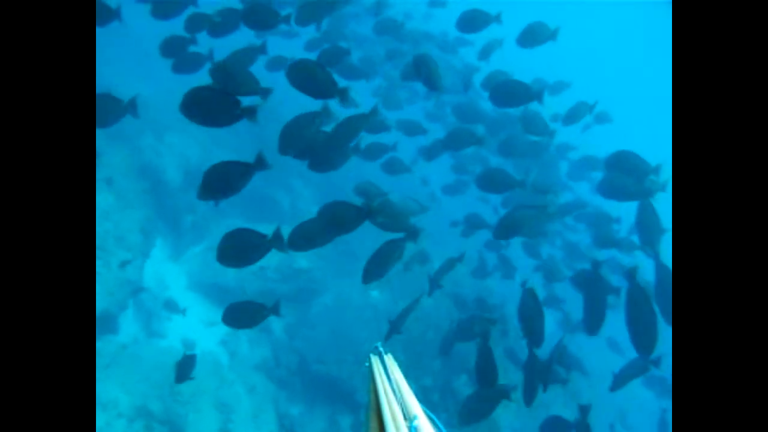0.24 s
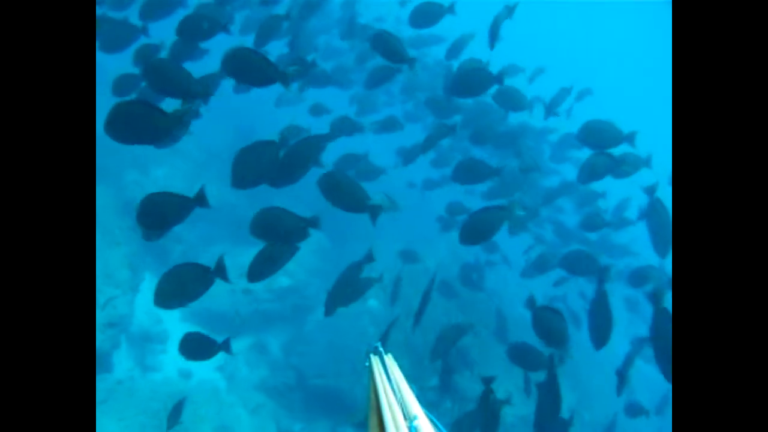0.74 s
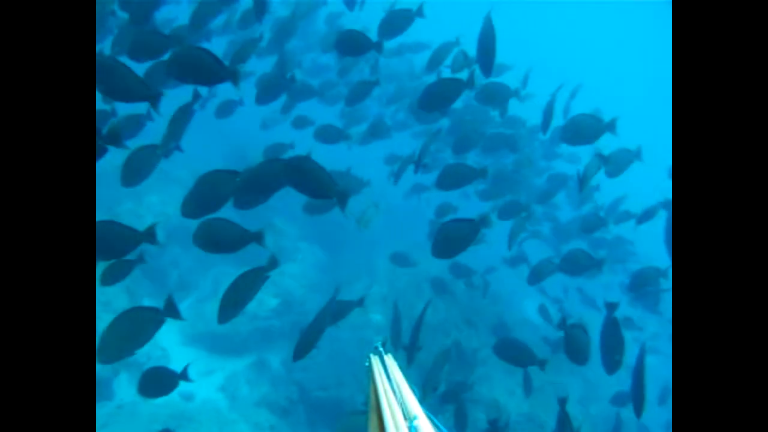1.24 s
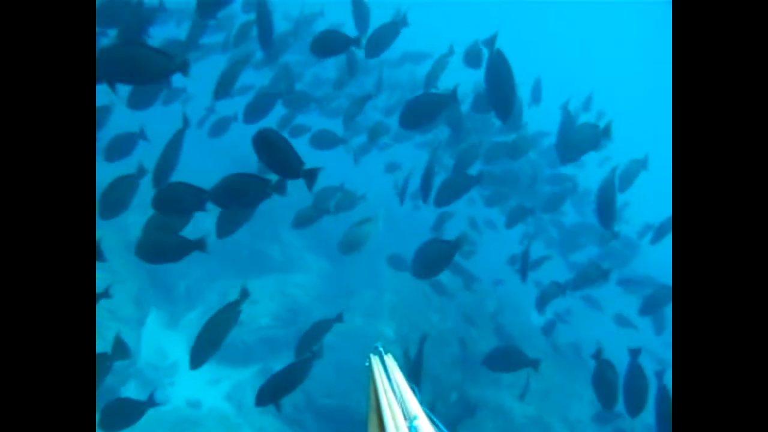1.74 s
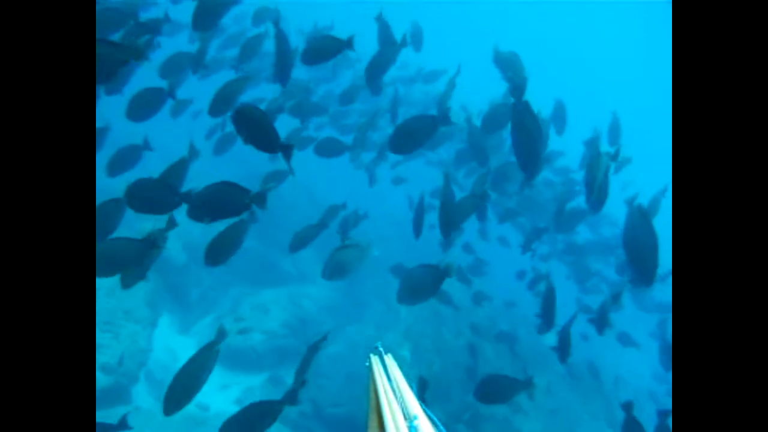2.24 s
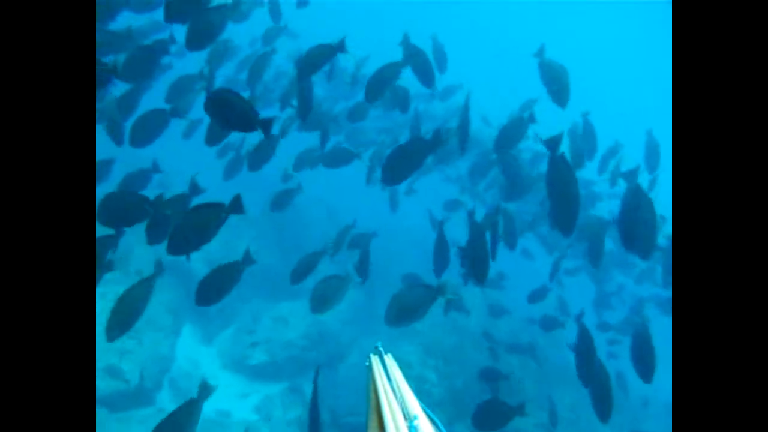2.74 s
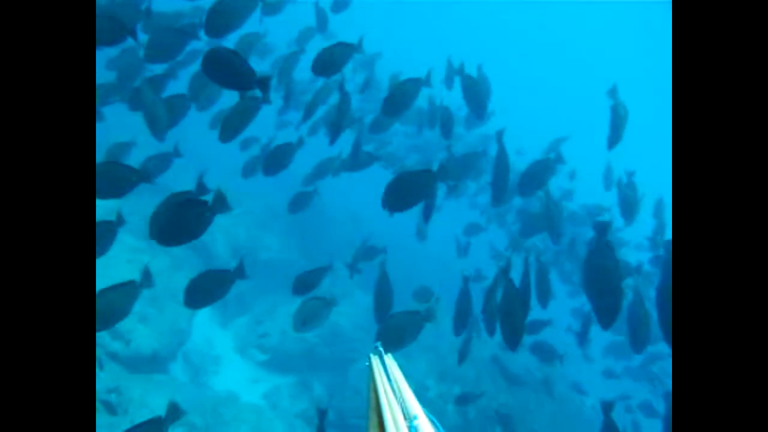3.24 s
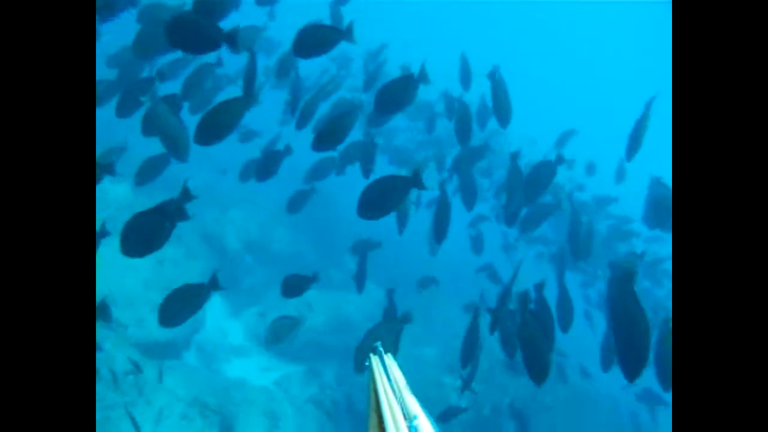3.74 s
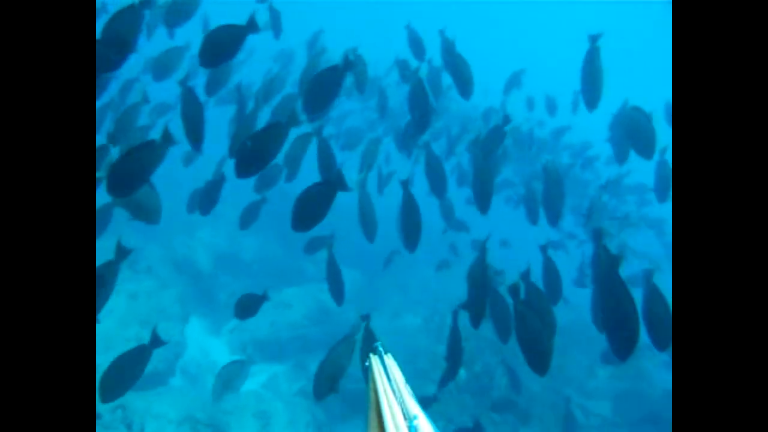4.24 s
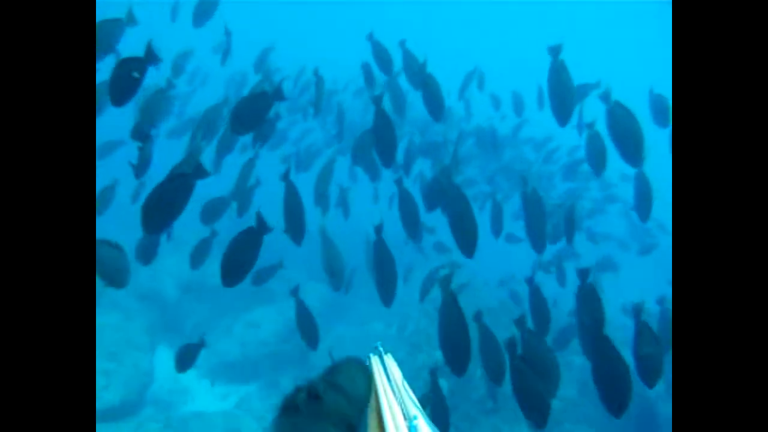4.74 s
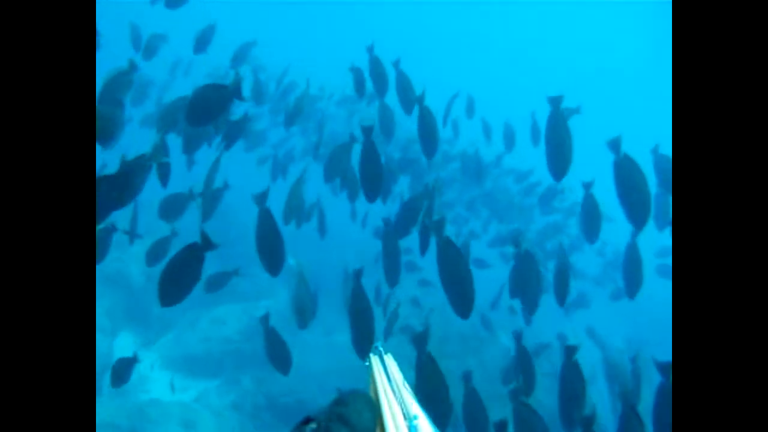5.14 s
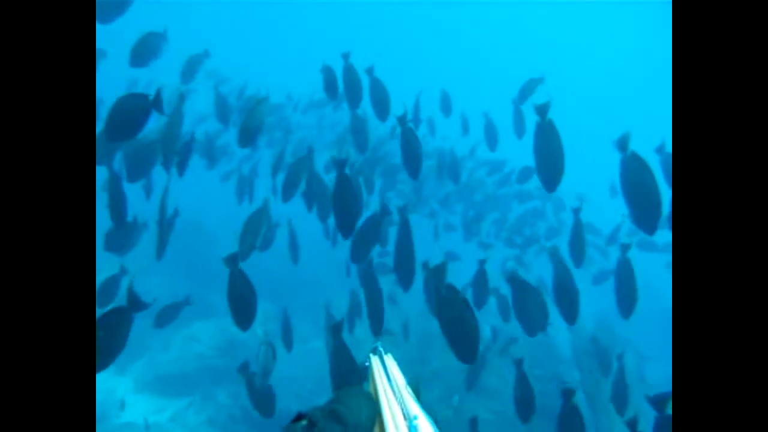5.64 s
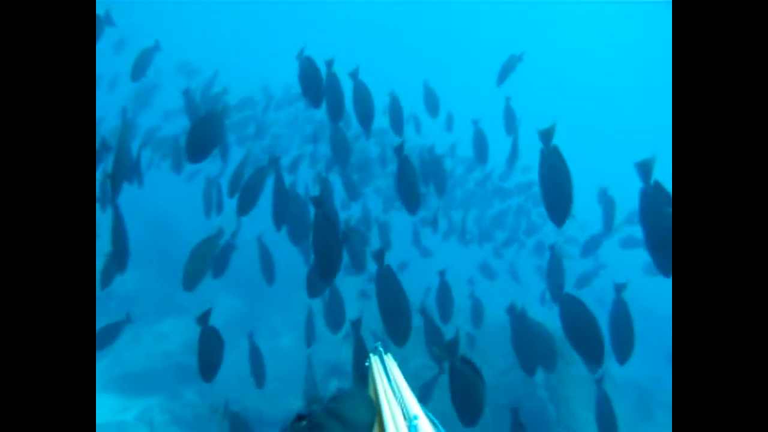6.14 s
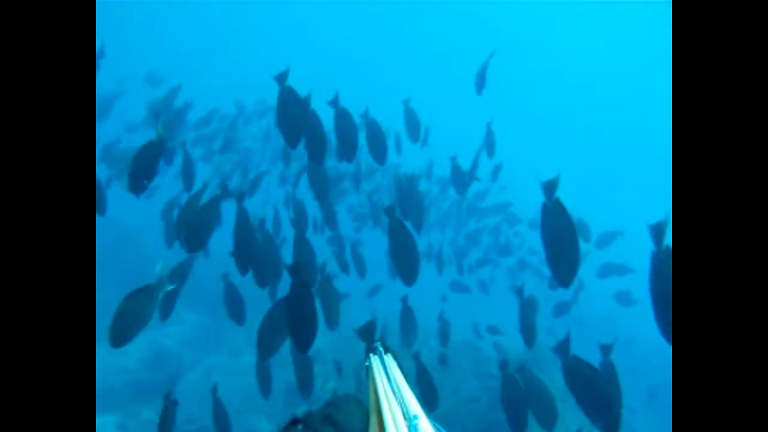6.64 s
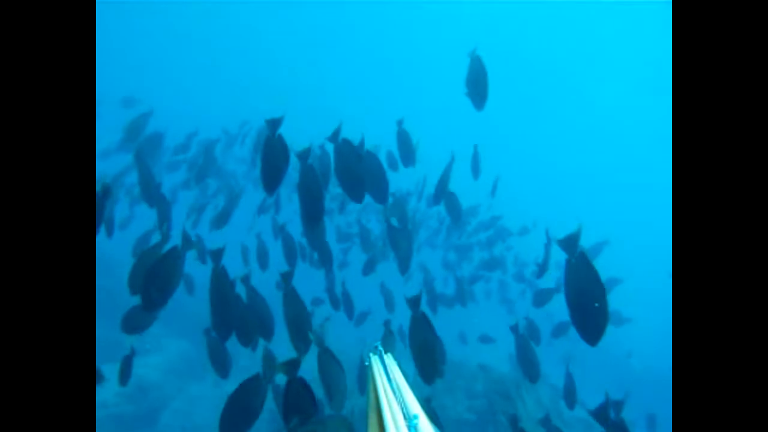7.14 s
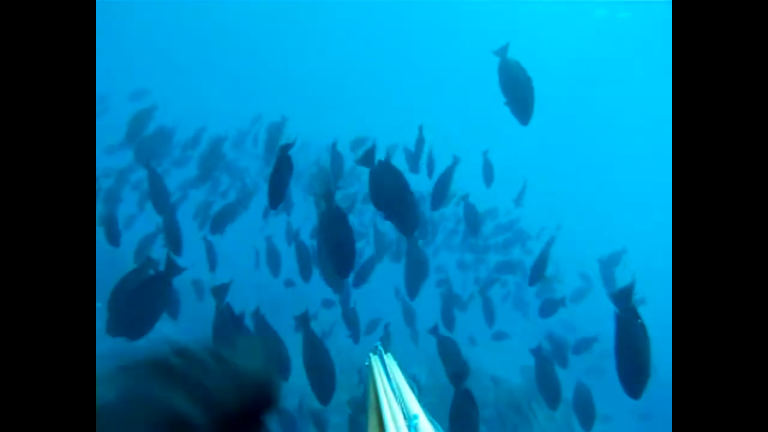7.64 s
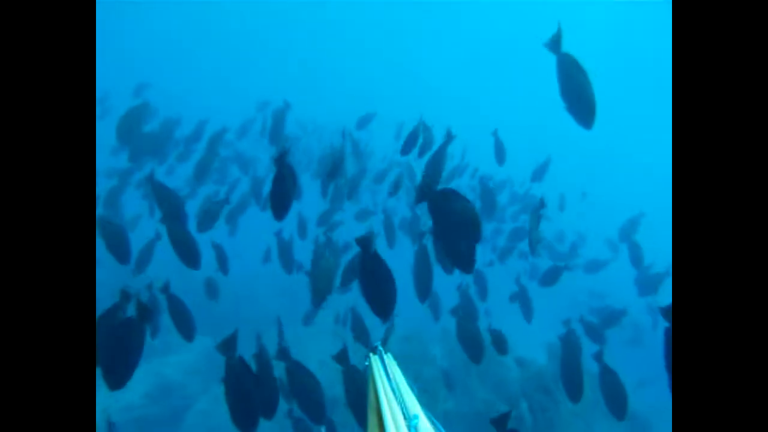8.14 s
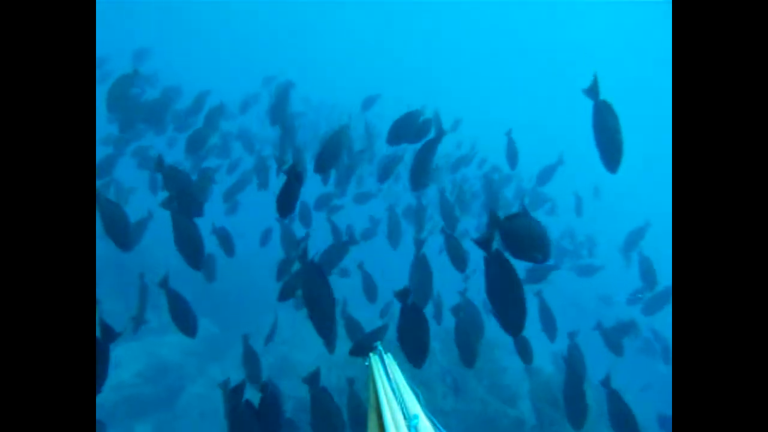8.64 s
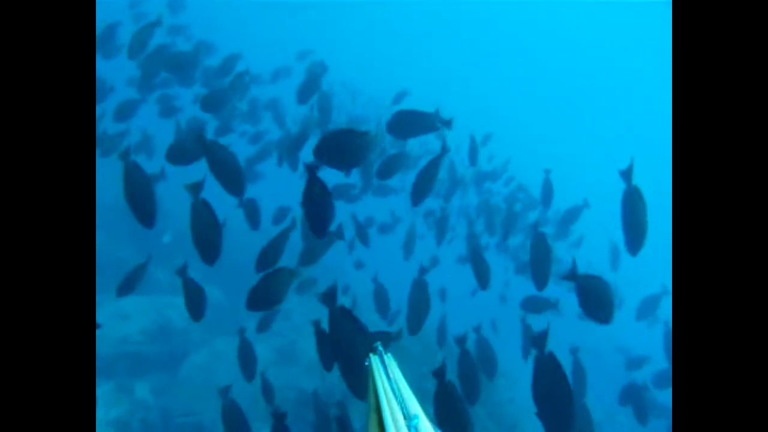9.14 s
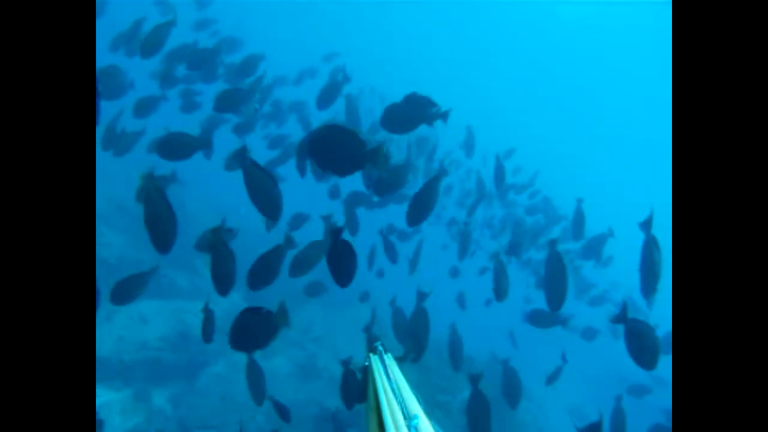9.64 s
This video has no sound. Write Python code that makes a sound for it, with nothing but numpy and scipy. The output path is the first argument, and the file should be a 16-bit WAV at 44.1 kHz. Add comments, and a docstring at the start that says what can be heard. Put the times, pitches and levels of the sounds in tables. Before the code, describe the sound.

Underwater beside a school of fish, a sealed microphone picks up constant shrimp crackle and muffled hiss with sharper near snaps. A low rumble wavers underneath. Soft fish thumps and a tiny rough grunt come early, then a hard overloading knock at three seconds. Short watery swishes follow, and near the end a tap, a brief brushing rub and more loud snaps.

```python
"""Snapping shrimp and fish on a reef

A microphone in a sealed housing hangs among a school of fish. Shrimp snaps are filtered noise bursts, crackling
near and far and merging into a hiss coloured by the housing. Fish thump and knock as decaying modes and grunt
as gliding beats; water swishes past as resonant noise as the diver moves, over a wavering flow rumble.
One hard blow overloads the input, something taps and brushes the housing, and one thin high tick sounds.
The converter samples slowly and holds each value, so the treble mirrors the lower sound."""
import sys
import numpy as np
from scipy import signal
from scipy.io import wavfile
from scipy.ndimage import uniform_filter1d

SR = 44100
rng = np.random.default_rng(int(sys.argv[2]) if len(sys.argv) > 2 else 0)


def log_audio(samples):
    """Write samples as a 16-bit WAV file to the path given in sys.argv[1]."""
    # one column per channel
    frames = np.atleast_2d(samples).T
    # limit to full scale, then quantise
    limited = np.clip(frames, -1, 1)
    pcm = np.round(limited * 32767).astype(np.int16)
    wavfile.write(sys.argv[1], SR, pcm)


N = 435708

# how the housing passes sound from the water: (frequency [Hz], relative gain [dB])
HOUSING_RESPONSE = [(700, -27), (1060, -30.5), (1440, 1), (1810, -6.5), (2270, 4), (3010, -8.5), (3660, -3),
                    (4500, -10), (5250, -13.5), (5600, -16), (6050, -26), (7000, -55.5)]


def amp(db):
    """Level to amplitude: 20 dB is a factor of ten."""
    return 10 ** (np.asarray(db) / 20)


def evened(x):
    """Normalisation to unit root-mean-square value."""
    return x / np.sqrt(np.mean(x ** 2) + 1e-20)


def drift(length, size):
    """Lowpass noise: a moving average over size samples leaves a slow random swing of unit RMS."""
    return evened(uniform_filter1d(rng.standard_normal(length), size=size))


def over_hz(points, hz):
    """Spectral envelope: dB values interpolated along log frequency."""
    f, value = np.transpose(points)
    return np.interp(np.log(hz + 1), np.log(f + 1), value)


def over_time(rows, column=1):
    """Temporal envelope: one table column interpolated at every sample."""
    rows = np.asarray(rows)
    return np.interp(np.arange(N) / SR, rows[:, 0], rows[:, column])


def add(mix, s, sound):
    """Superposition: a sound is added in place from s seconds on."""
    part = mix[round(s * SR):][:len(sound)]
    part += sound[:len(part)]


def causal(db):
    """Minimum phase: the Hilbert transform of log gain gives the phase; db covers half the circle."""
    full_circle_db = np.r_[db, db[-2:0:-1]]
    log_gain = np.log(amp(np.maximum(full_circle_db, -100)))
    spectrum = np.exp(np.conj(signal.hilbert(log_gain)))
    return np.fft.ifft(spectrum).real[:len(db)]


def resonate(x, hz, width):
    """Heterodyne resonator: shifts hz down to zero, smooths, and shifts back."""
    turn = np.exp(2j * np.pi * np.cumsum(hz * np.ones(len(x))) / SR)
    r = np.exp(-np.pi * width / SR)
    return 2 * (turn * signal.lfilter([1 - r], [1, -r], x / turn)).real


def resonate_twice(x, hz, width):
    """Cascaded resonators: a second equal pass steepens the skirts of the band."""
    return resonate(resonate(x, hz, width), hz, width)


def ring_modes(modes, t):
    """Modal superposition: sines from rest, each losing 60 dB in its own t60."""
    return sum(amp(db - 60 * t / t60) * np.sin(2 * np.pi * hz * t) for hz, db, t60 in modes)


def patchy_noise(points, patchy_db, flicker_db, size):
    """Short-time spectral synthesis: random spectra with drifting patches and a flicker shared by all bins."""
    frames, hz = N * 4 // size + 5, np.fft.rfftfreq(size, 1 / SR)
    a, b, patches = rng.standard_normal((frames, len(hz), 3)).T
    patches = uniform_filter1d(patches, size=8, axis=0)  # along frequency
    patches = evened(uniform_filter1d(patches, size=6, axis=1))  # along time
    level_db = over_hz(points, hz)[:, None] + patchy_db * patches + flicker_db * drift(frames, 4)
    spectra = (a + 1j * b) * amp(level_db)
    return evened(signal.istft(spectra, nperseg=size, noverlap=size * 3 // 4)[1][:N])


def snap(tilt_db, tail_db, colour_db):
    """Cavitation: a collapsing bubble and its reef scatter, convolved with housing and path response; peak 1."""
    hz, t = np.fft.rfftfreq(2048, 1 / SR), np.arange(4096) / SR
    tail = amp(tail_db - 60 * t / 0.012) + amp(tail_db - 7.5 - 60 * t / 0.12)  # early and late decay
    scatter = rng.standard_normal(len(t)) * tail
    scatter *= amp(6.44 * drift(len(t), 60))  # echoes arrive in lumps
    scatter[0] = 10.0  # the collapse itself
    scatter[rng.integers(80, 500)] = -6.0  # one strong bounce off nearby rock
    jet = .15 * rng.standard_normal(round(0.0012 * SR))  # a faint jet runs 1.2 ms ahead of the collapse
    path_db = colour_db * np.cos(2 * np.pi * (np.log2(hz + 1) / 1.6 + rng.random()))  # ripple, 1.6 octaves apart
    slope_db = tilt_db * np.log2(np.maximum(hz, 1000) / 2300)  # flat below 1 kHz
    colour = causal(over_hz(HOUSING_RESPONSE, hz) + slope_db + path_db)
    sound = np.convolve(np.r_[jet, scatter], colour)[:len(t)]
    return sound / abs(sound).max()


def shrimp():
    """Superposed impulses: hiss of the far crowd, random crackle at middle distance, and near snaps."""
    # far shrimp merged into hiss:
    # (time [s], hiss level before clumping [dB], gain of added treble of hiss and crackle [dB])
    hiss_rows = [(0.0, -45, -7), (2.9, -43.5, -29), (4.9, -49, -6.5), (8.3, -44.5, -17), (9.88, -46.5, -27)]
    # near snaps: (time [s], peak [dB], tilt above 1 kHz [dB per octave])
    near_snaps = [(0.0623, -21.5, 5), (0.224, -18, 5), (0.2802, -21.5, 9), (0.735, -20.5, 2),
                  (0.7705, -22.5, 5), (0.816, -22.5, -8.5), (0.9888, -20, -6.5), (1.1229, -8, 1.5),
                  (1.3482, -19, -6.5), (1.429, -24, -3), (1.73, -18, -6), (1.924, -22.5, -4),
                  (1.9292, -14, 0.5), (2.063, -26.5, -8.5), (2.15, -18.5, -2), (2.1743, -21, 1),
                  (2.192, -27.5, 0), (2.5368, -11, 3.5), (2.574, -25, 0), (2.995, -18.5, 1.5),
                  (3.3874, -21.5, 1), (3.737, -39, 1), (3.8135, -20, -3.5), (3.93, -20.5, -3),
                  (3.967, -23, 2.5), (4.0596, -17.5, 5), (4.307, -17.5, -5.5), (4.6401, -20, -1),
                  (4.9781, -23, 1), (5.071, -27, 6), (5.093, -21.5, 5), (5.148, -28, -2), (5.2, -24.5, 1),
                  (5.445, -24.5, 5), (5.533, -23, 9), (5.673, -18.5, 2), (5.7115, -19.5, 10),
                  (6.2494, -19, 5.5), (7.181, -19, 1), (7.3298, -30, -8), (7.415, -16.5, -5.5),
                  (7.8144, -19, -7.5), (7.878, -18.5, 2.5), (7.958, -29, 8), (8.162, -25, -12.5),
                  (8.1821, -19, -7.5), (8.784, -22, 3), (9.0676, -21, -10.5), (9.1074, -23, -3),
                  (9.2273, -23, -4), (9.486, -7, -3.5), (9.585, -11.5, 7), (9.8, -19.5, 3.5)]
    base_rate_per_s, crackle_db, spread_db = 330, -47.5, 5.0  # clumps vary the rate

    clumps = amp(6.0 * drift(N, SR // 25))  # snaps come in short clusters
    clumps *= amp(1.9 * drift(N, SR // 6))  # and in longer swells
    hiss = patchy_noise(HOUSING_RESPONSE, patchy_db=2.5, flicker_db=1.0, size=256)
    out = amp(over_time(hiss_rows)) * clumps ** 0.071 * hiss

    sizes = amp(spread_db * np.minimum(rng.exponential(1, N), 3.5))
    sizes *= rng.random(N) < clumps * base_rate_per_s / SR
    which = rng.integers(0, 12, N)  # each snap takes one of twelve timbres
    crackle = np.zeros(N)
    for k, tilt in enumerate(np.linspace(-1, 1, 12)):
        timbre = snap(3.0 * tilt + 1.92, -11.5, colour_db=7.5)
        crackle += signal.oaconvolve(sizes * (which == k), timbre)[:N]
    out += amp(crackle_db) * evened(crackle)
    out += amp(over_time(hiss_rows, column=2)) * resonate(out, 4500, 1100)

    for s, db, tilt_db in near_snaps:
        # dull and weak snaps come from further off and trail more
        tail_db = min(-11 - 0.5 * tilt_db - 0.3 * db, 3.0)
        add(out, s, amp(db) * snap(tilt_db, tail_db, colour_db=-1.0))
    return out


def swish(length, db, hz):
    """Eddy excitation: sparse impulses drive low resonances; a quick rise, then level and pitch sink."""
    u = np.linspace(0, 1, round(length * SR))
    eddies = rng.standard_normal(len(u)) * (rng.random(len(u)) < .04)
    centre_hz = hz * (1 - 0.079 * u)
    body = resonate(resonate(eddies, centre_hz, 71), centre_hz, 107.0)
    body += 0.25 * (1 - 0.64 * u) * resonate_twice(eddies, 1.7 * centre_hz, 300)
    body /= np.sqrt(uniform_filter1d(body ** 2, size=3000))  # the stroke sets its strength
    rise = np.minimum(u / 0.14, 1)  # over 14 % of the length
    shape = rise * amp(db - 5.5 * u) * signal.windows.tukey(len(u), .15)
    return shape * evened(body)


def water():
    """Flow noise: narrowband rumble, broadband wash, a late rush, and lumpy swishes round the housing."""
    # flow rumble: (time [s], level [dB])
    rumble_rows = [(0.0, -45.5), (2.4, -45), (3.2, -41), (4.4, -43), (4.62, -35), (4.8, -43.5), (5.3, -36),
                   (5.4, -45.5), (8.45, -44.5), (9.8, -43)]
    # low wash of the sea: (frequency [Hz], relative spectral density [dB per Hz])
    wash_colour = [(35, -27.5), (60, -2.5), (188, -18), (254, -13.5), (384, -21.5), (745, -17),
                   (1060, -27.5), (1200, -32.5), (1700, -60)]
    # water swishing past: (start [s], length [s], level before shaping [dB], starting centre frequency [Hz])
    swish_rows = [(1.83, 0.039, -46, 105), (2.318, 0.68, -56, 250), (3.337, 0.246, -41, 192),
                  (3.574, 0.059, -44, 199), (4.309, 0.077, -48, 116), (4.573, 0.13, -47.5, 96),
                  (5.499, 0.33, -53, 130), (6.479, 0.03, -49, 121.4), (6.743, 0.037, -48, 94),
                  (7.954, 0.15, -45, 113), (8.331, 0.52, -48, 119), (9.002, 0.044, -41.5, 105),
                  (9.441, 0.099, -47.5, 168), (9.556, 0.062, -47, 102), (9.627, 0.088, -46.5, 250),
                  (9.699, 0.12, -44.5, 108)]

    rumble = resonate_twice(rng.standard_normal(N), 39.2, 9.5)
    rumble /= np.sqrt(uniform_filter1d(rumble ** 2, size=SR // 3))  # the flow sets its strength
    out = amp(over_time(rumble_rows)) * rumble
    out += amp(-54.5) * patchy_noise(wash_colour, patchy_db=4.0, flicker_db=2.5, size=1024)

    rush = evened(resonate_twice(rng.standard_normal(N), 830, 174))
    rush_from_s, rush_grow_s = 6.57, 1.15
    growth = np.clip((np.arange(N) / SR - rush_from_s) / rush_grow_s, 0, 1)
    out += amp(-60) * growth * rush
    for s, *stroke in swish_rows:
        add(out, s, swish(*stroke))
    return out


def scattered(x, trail_db, t60):
    """Reverberation: convolution with decaying noise, as the reef throws a sound back in a rough trail."""
    trail = rng.standard_normal(SR // 10) * amp(-60 * np.arange(SR // 10) / SR / t60)
    return x + amp(trail_db) * signal.oaconvolve(x, trail / np.linalg.norm(trail))[:N]


def pulse(modes, tilt_db, rise_s):
    """Modal decay: a few short modes start nearly in step, swell and die; peak 1."""
    t = np.arange(SR // 8) / SR
    pivot_hz = modes[len(modes) // 3][0]
    ring = np.zeros(len(t))
    for hz, db, t60 in modes:
        level_db = db + tilt_db * np.log2(hz / pivot_hz) - 60 * t / t60
        ring += amp(level_db) * np.sin(2 * np.pi * (hz * t + 0.3 * rng.random()))
    ring *= 1 - np.exp(-(t / rise_s) ** 2)
    return ring / abs(ring).max()


def knocks():
    """Impulsive modal excitation: single beats of swim bladders, low and high, the tap and the tick."""
    # low thumps, higher knocks of fish, a tap on the housing, one thin high tick:
    # (time [s], peak before scatter [dB], tilt across the modes [dB per octave])
    thump_rows = [(0.004, -28.5, 2.5), (1.315, -31.5, 2), (4.465, -19.5, -1), (5.033, -33, -2.5),
                  (5.312, -24.5, 4.5), (5.349, -25.5, -17), (6.1, -21.5, -3), (7.635, -21.5, 2),
                  (9.013, -26.5, 18)]
    knock_rows = [(0.004, -28.5, -11), (1.227, -33, -11), (1.348, -24.5, 2), (2.365, -37.5, -5),
                  (6.969, -36.5, 20), (7.416, -31, 34), (7.814, -28, 14)]
    tap_rows = [(8.03, -15.5, 7)]
    tick_rows = [(8.978, -26, 0.1)]
    # modes of each kind: (frequency [Hz], relative level [dB], t60 [s])
    thump_modes = [(158, 13.5, 0.03), (259, 4, 0.053), (424, -5.5, 0.039), (500, -7, 0.034)]
    knock_modes = [(434, -7.5, 0.047), (577, 8.5, 0.02), (750, -1.5, 0.033), (930, -10, 0.029)]
    tap_modes = [(764, 0, 0.07), (1260, -2, 0.021), (1470, 13, 0.016), (1570, 8, 0.02), ]
    tick_modes = [(5400, 0, 0.007)]

    kinds = [(thump_rows, thump_modes, .005), (knock_rows, knock_modes, .002),
             (tap_rows, tap_modes, .0015), (tick_rows, tick_modes, .0003)]
    out = np.zeros(N)
    for rows, modes, rise_s in kinds:
        for s, db, tilt_db in rows:
            add(out, max(s - rise_s / 2, 0), amp(db) * pulse(modes, tilt_db, rise_s))
    return scattered(out, trail_db=-11.0, t60=0.12)


def grunts():
    """Frequency glide: each beat is a few cycles rising in pitch; the reef scatters it into a rough trail."""
    # quick beats of a fish: (time [s], peak before scatter [dB])
    beat_rows = [(0.321, -46), (0.362, -41), (0.395, -39), (0.43, -39.5), (1.628, -32.5), (1.653, -31.5),
                 (1.661, -40), (1.667, -36.5), (1.685, -31.5), (1.695, -43)]
    from_hz, to_hz, beat_s = 410, 900, 0.0064  # each beat's pitch varies by up to 10 %
    u, out = np.linspace(0, 1, round(beat_s * SR)), np.zeros(N)
    for s, db in beat_rows:
        pitch, phase = rng.random(2)
        hz = (from_hz + (to_hz - from_hz) * u) * (.9 + .2 * pitch)
        tone = np.sin(2 * np.pi * (np.cumsum(hz) / SR + phase))
        add(out, s - .001, amp(db) * np.sin(np.pi * u ** 0.66) ** 2 * tone)
    return scattered(out, trail_db=-1.5, t60=0.15)


def blow():
    """Impact: contact of a few milliseconds rings the housing; dull rattle, fading ring and low surge follow."""
    # modes during contact: (frequency [Hz], level before the blow's gain [dB], t60 [s])
    contact_modes = [(416, 2, 0.078), (584, 10, 0.034), (1128, 0.5, 0.049), (1407, 8.5, 0.012),
                     (2170, 7, 0.026), (2710, -3.5, 0.028), (3625, -2.5, 0.05)]
    # what rings on once the contact ends: (frequency [Hz], level [dB], t60 [s])
    after_modes = [(250, -23, 0.05), (419, -26, 0.063), (603, -22, 0.12), (690, -18, 0.065)]
    start_s, contact_db = 3.0871, -0.5

    t, out = np.arange(SR // 5) / SR, np.zeros(N)
    crack = amp(-2.0) * rng.standard_normal(len(t)) * amp(-60 * t / 0.07)
    held = np.exp(-(t / .0041) ** 6)  # the contact ends and damps the ring
    rattle = evened(resonate_twice(rng.standard_normal(len(t)), 520, 350))
    surge = evened(resonate(resonate(rng.standard_normal(len(t)), 89, 60), 90, 60))
    add(out, start_s, -amp(contact_db) * (ring_modes(contact_modes, t) + crack) * held)
    after = amp(-4.5 - 60 * t / 0.054) * rattle
    after += amp(-20.0) * crack
    after += ring_modes(after_modes, t)
    after += amp(-30 - 60 * t / 0.21) * surge
    add(out, start_s, after)
    return out


def rub():
    """Friction: something brushes the housing; dense uneven slips pass its lower resonances."""
    # lower resonances of the housing: (frequency [Hz], relative gain [dB])
    rub_colour = [(150, -10.5), (450, 0), (800, -7.5), (1070, -8), (1450, 5), (1750, -3), (2150, 1.5),
                  (2900, -18), (6000, -35)]
    rise_s, hold_s, fall_s = 0.025, 0.074, 0.17
    t = np.arange(0, rise_s + hold_s + fall_s, 1 / SR)
    slips = rng.standard_normal(len(t)) * amp(2.5 * drift(len(t), 350))
    response = causal(over_hz(rub_colour, np.fft.rfftfreq(2048, 1 / SR)))
    body = np.convolve(slips, response)[:len(t)]
    shape = np.clip(np.minimum(t / rise_s, ((t[-1] - t) / fall_s) ** 2), 0, 1)
    out = np.zeros(N)
    add(out, 8.4, amp(-34) * evened(body) * shape)
    return out


def scene():
    """Linear superposition: one microphone feeds both channels."""
    mid = shrimp() + water() + knocks() + grunts() + blow() + rub()
    return np.array([mid, mid])


def record(dry):
    """Sample-and-hold imaging: a slow clipping converter mirrors sound; gain control dips after overload."""
    # colour of a faint noise, opposite in the two channels: (frequency [Hz], relative level [dB])
    side_noise_colour = [(100, -21), (500, 1), (1500, -31.5), (9000, -10.5), (12300, -13.5)]
    hold_hz, edge_hz = 12000, 12300  # converter's own sample rate, final lowpass edge
    recover_s = 0.034

    side = amp(-84.5) * patchy_noise(side_noise_colour, patchy_db=7.0, flicker_db=0.0, size=1024)
    over = np.maximum(uniform_filter1d(np.minimum(abs(dry[0]), 1), size=200) - .2, 0)
    late = np.roll(over, SR // 200)  # the control reacts 5 ms late
    step = 1 / (recover_s * SR)
    dip_db = 280.0 * signal.lfilter([step], [1, step - 1], late)

    top = np.array([[.97], [.92]])  # clipping limit of each channel
    samples = np.clip(signal.resample_poly(dry * amp(-dip_db), hold_hz, SR, axis=1), -top, top)
    stairs = np.repeat(samples, 4, axis=1)  # held values keep the images above half the rate
    held = signal.resample_poly(stairs, SR, 4 * hold_hz, axis=1)[:, :N]
    lowpass = signal.firwin(511, edge_hz, window=("kaiser", 9), fs=SR)
    return signal.oaconvolve(held + [side, -side], lowpass[None], "same")


dry = scene()
out = record(dry)
log_audio(out)
```